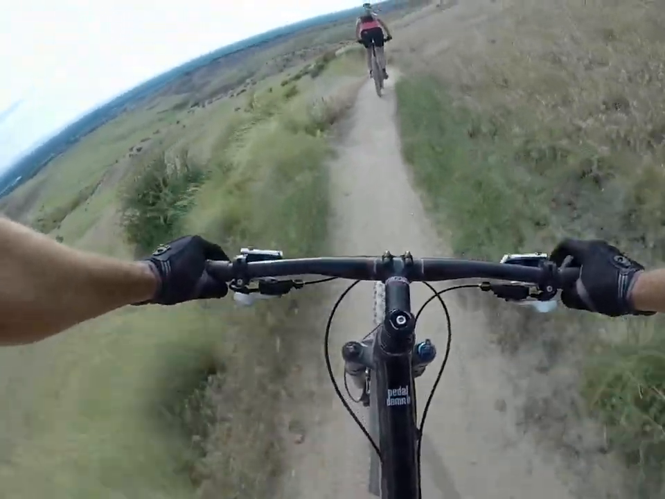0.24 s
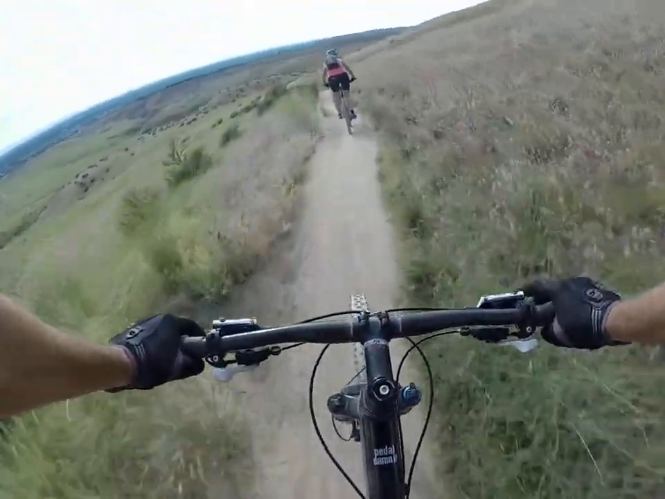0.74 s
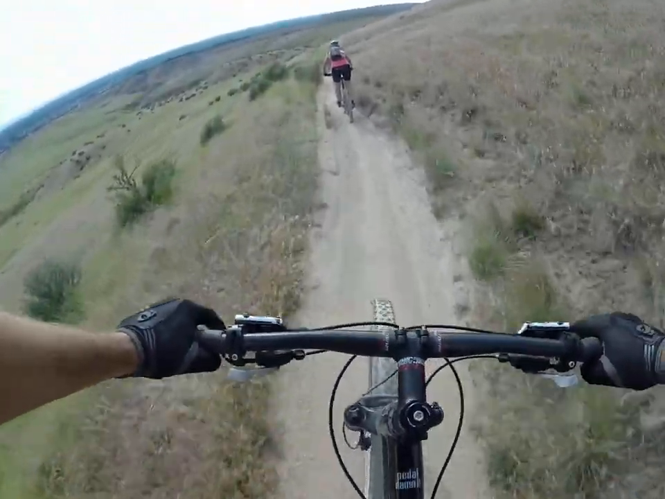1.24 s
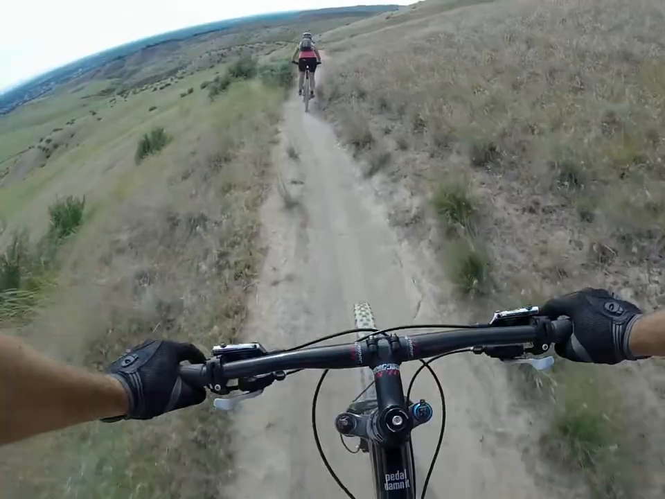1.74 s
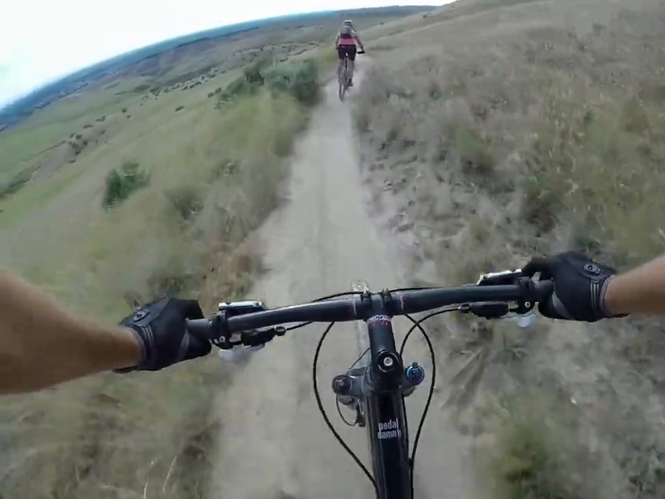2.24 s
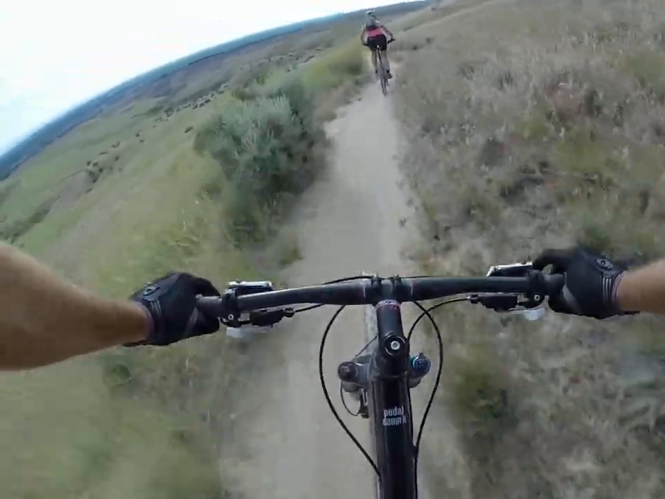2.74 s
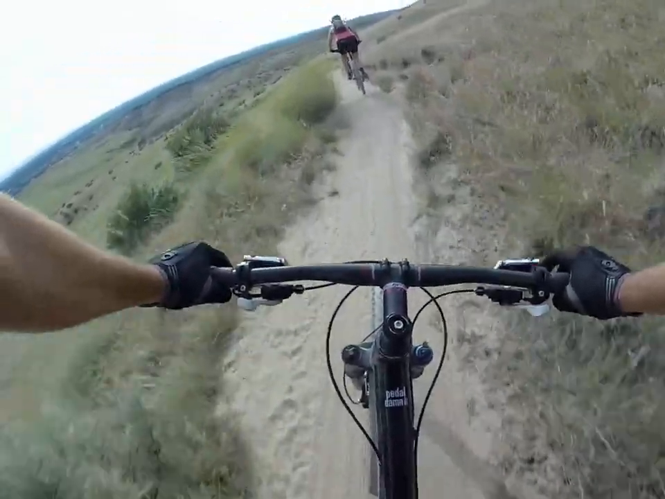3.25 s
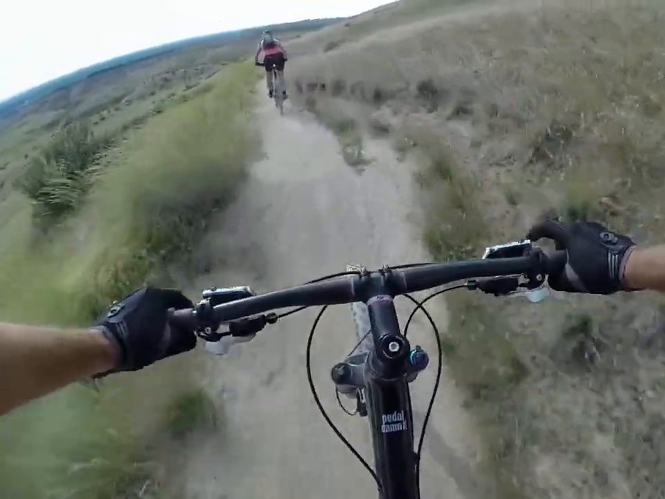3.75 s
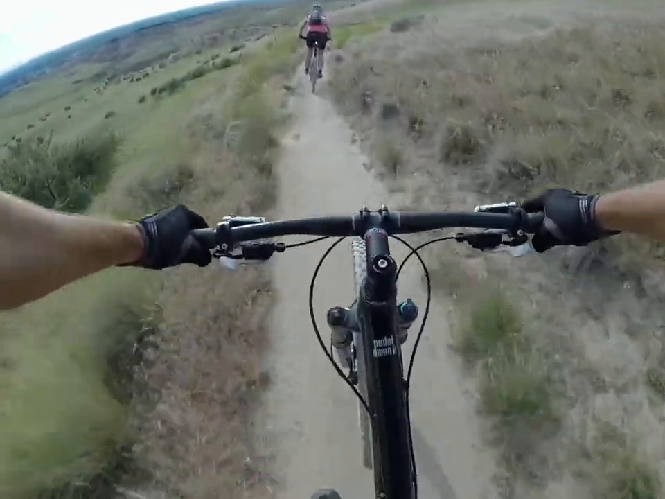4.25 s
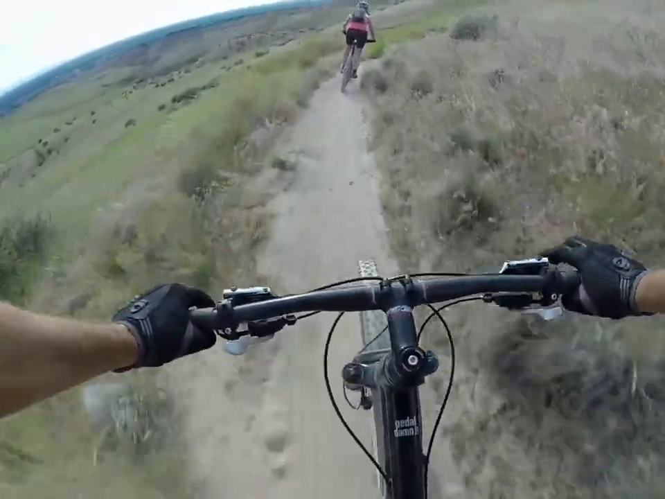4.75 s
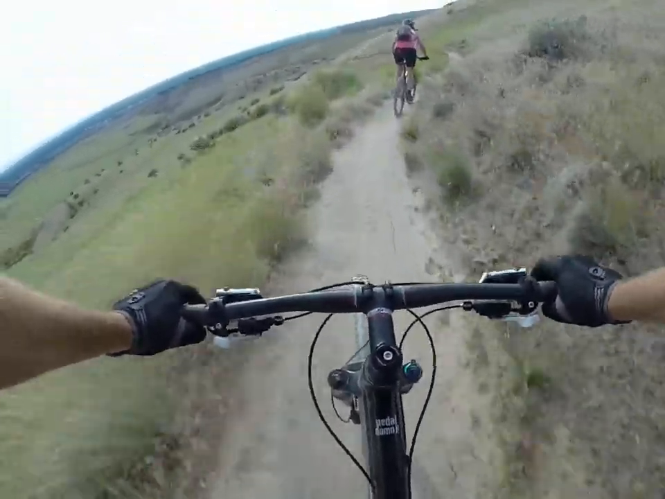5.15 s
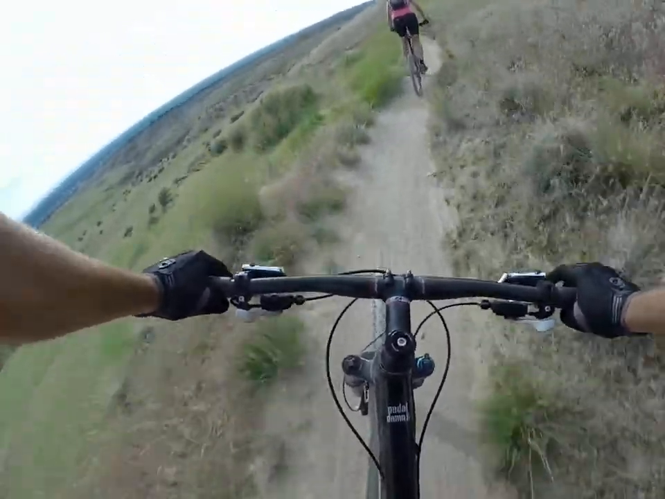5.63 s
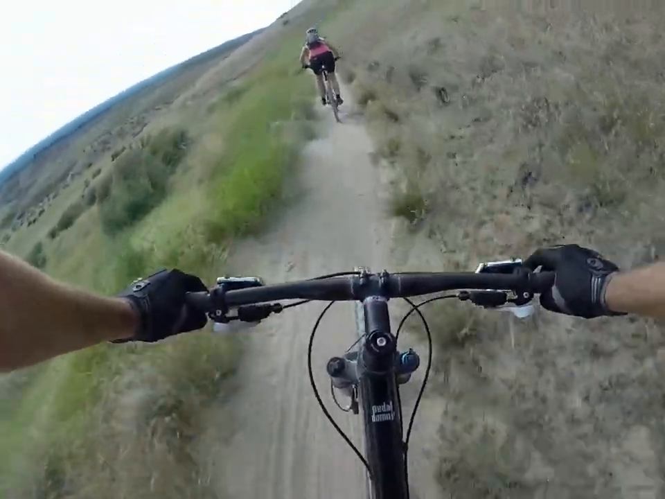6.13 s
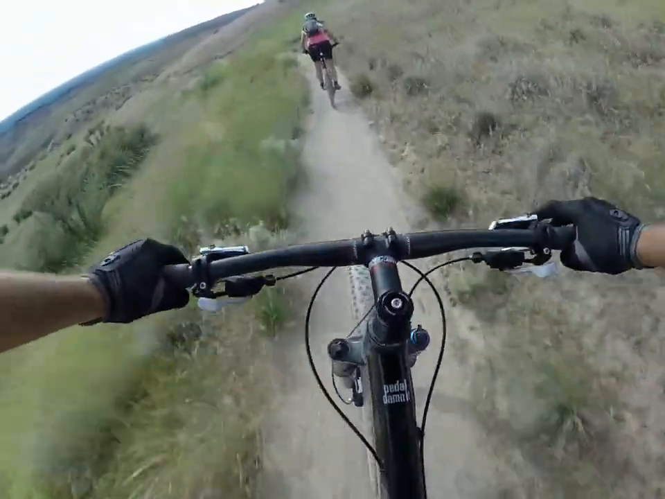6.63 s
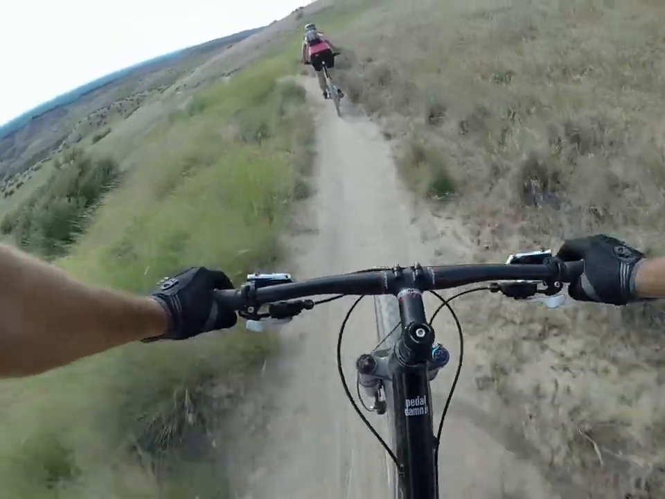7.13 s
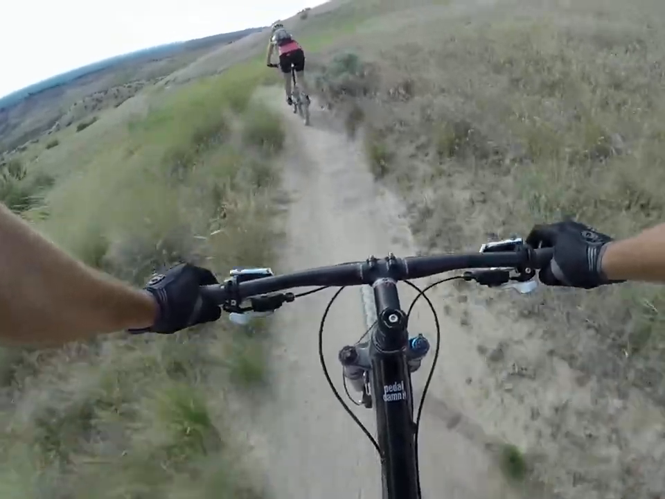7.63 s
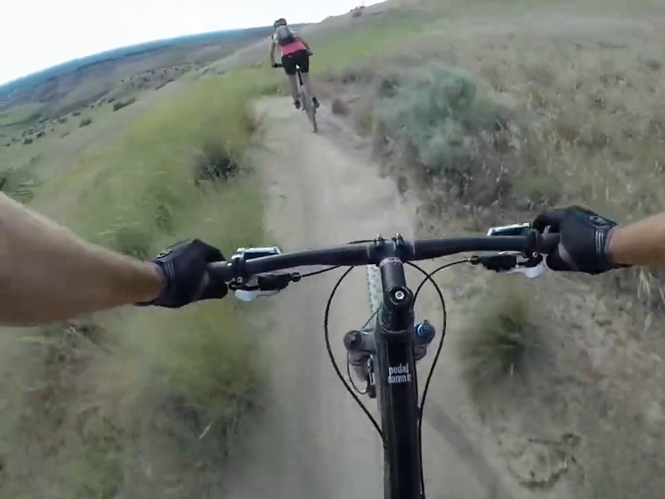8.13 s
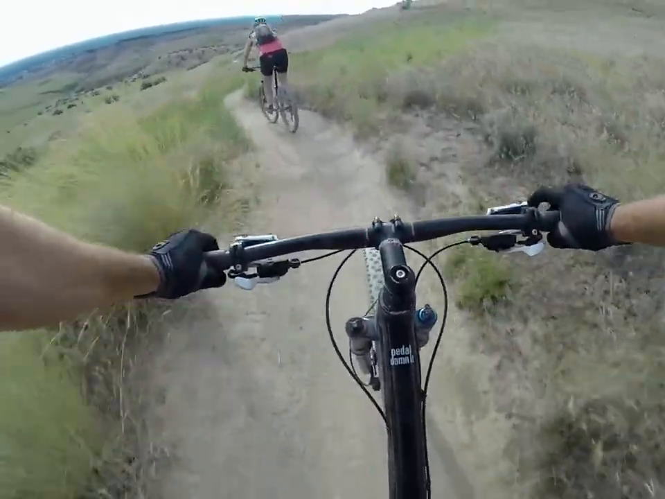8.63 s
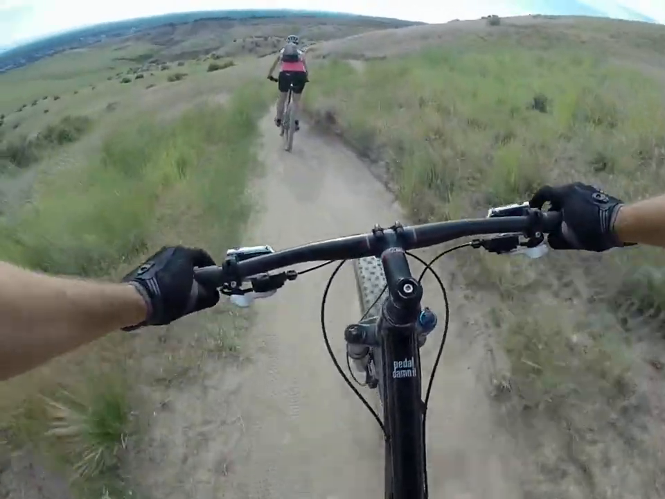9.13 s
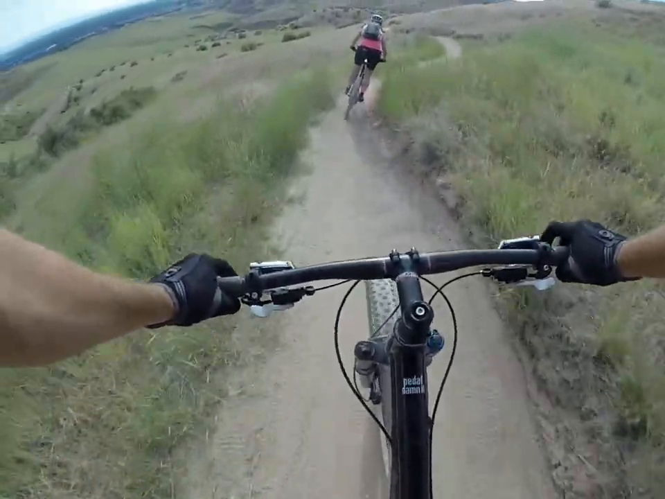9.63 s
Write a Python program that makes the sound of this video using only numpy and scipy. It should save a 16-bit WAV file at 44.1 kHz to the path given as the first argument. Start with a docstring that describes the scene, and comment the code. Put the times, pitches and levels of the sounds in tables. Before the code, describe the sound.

Wind buffets the microphone as a mountain bike coasts over crunching dirt, its disc brakes squealing on and off between bumps and knocks.

```python
"""Wind buffets the microphone and knobby tyres rumble and crunch: a mountain bike coasts down a dry dirt
trail, heard from a cased camera on the rider's chest, about a metre above the wheels, in open air.
The freehub's pawls tick; disc brake pads drag, graze and stick on the rotors, which whirr, chirp and squeal.
Dips heave the camera, the chain slaps, stones click on the frame and bumps knock the case.
Near the middle the bike lands a small hop; towards the end it brakes hard and rolls on."""
import sys
import numpy as np
from scipy import signal
from scipy.fft import rfft, irfft, next_fast_len
from scipy.io import wavfile
from scipy.ndimage import uniform_filter1d

SR = 44100
rng = np.random.default_rng(int(sys.argv[2]) if len(sys.argv) > 2 else 0)


def inscribe(sig):
    """Save sig as 16-bit PCM at rate SR to the path in sys.argv[1].

    A 1-D sig is mono; a 2-D sig holds one channel per row.
    Samples are clipped to [-1, 1] before scaling.
    """
    pcm = np.round(np.clip(np.atleast_2d(sig).T, -1, 1) * 32767)
    wavfile.write(sys.argv[1], SR, pcm.astype(np.int16))


N = 435708
TIME = np.arange(N) / SR


def from_db(db):
    """Decibels to gain."""
    return 10 ** (np.asarray(db) / 20)


def rms_one(x):
    """Scale to unit power."""
    return x / np.sqrt(np.mean(x ** 2) + 1e-20)


def in_time(rows):
    """Rows of (time, values...) as one curve per value, at every sample."""
    s, *columns = np.transpose(rows)
    return [np.interp(TIME, s, column) for column in columns]


def swell(s, half_s):
    """A bell curve of height 1 at time s, down to 1/e at half_s either side."""
    out = np.zeros(N)
    near = slice(*np.searchsorted(TIME, [s - 4 * half_s, s + 4 * half_s]))
    out[near] = np.exp(-((TIME[near] - s) / half_s) ** 2)
    return out


def drift(hz):
    """A random wander of rms 1, mostly slower than hz."""
    step, settle = 40, 2000
    pole = np.exp(-2 * np.pi * hz * step / SR)
    noise = rng.standard_normal(N // step + settle + 2)
    slow = signal.lfilter([1], [1, -2 * pole, pole * pole], noise)[settle:]
    return np.interp(np.arange(N) / step, np.arange(len(slow)), rms_one(slow))


def grains(per_s, spread_db):
    """Random clicks of uneven size; rms 1."""
    sizes = from_db(spread_db * np.minimum(rng.exponential(1, N), 5))
    return rms_one(sizes * rng.choice([-1, 1], N) * (rng.random(N) < per_s / SR))


def colour(x, spectrum):
    """Shape a steady sound by rows of (frequency [Hz], gain [dB]); rms 1."""
    size = next_fast_len(N)
    hz, db = np.transpose(spectrum)
    bins = np.maximum(np.fft.rfftfreq(size, 1 / SR), 1)
    gain = from_db(np.interp(np.log(bins), np.log(hz), db, left=-120))
    return rms_one(irfft(rfft(x, size) * gain, size)[:N])


def highpass(x, hz):
    """Roll off the sound below hz."""
    return signal.sosfilt(signal.butter(2, hz, "high", fs=SR, output="sos"), x)


def even(x, seconds):
    """Hold the power of a noise steady over the given time."""
    size = max(int(seconds * SR), 2)
    return x / np.sqrt(uniform_filter1d(uniform_filter1d(x * x, size), size) + 1e-12)


def resonate(x, modes):
    """Pass a sound through parallel resonances, rolled off above 8.6 kHz; rms 1."""
    out = 0
    for hz, width, db in modes:
        r = np.exp(-np.pi * width / SR)
        poles = [1, -2 * r * np.cos(2 * np.pi * hz / SR), r * r]
        out += from_db(db) * (1 - r * r) * signal.lfilter([1, 0, -1], poles, x + 1e-18)
    return rms_one(signal.sosfilt(signal.butter(6, 8600, fs=SR, output="sos"), out))


def ring(x, hz, t60):
    """One mode: a unit click sets off a decaying sine of height 1."""
    r, w = from_db(-60 / (t60 * SR)), 2 * np.pi * hz / SR
    return signal.lfilter([0, np.sin(w)], [1, -2 * r * np.cos(w), r * r], x + 1e-18)


def add(out, s, sound):
    """Mix a short sound in at time s."""
    start = int(np.clip(s * SR, 0, N - 1))
    out[start:start + len(sound)] += sound[:N - start]


def through_case(x):
    """Sound reaches the microphone through the resonances of the plastic case; rms 1."""
    # modes of the case: (frequency [Hz], width [Hz], gain [dB])
    case_modes = [(1594, 230, 4), (2260, 210, 7.5), (2720, 110, 0), (3230, 130, 2), (3735, 100, -2),
                  (4280, 170, -2), (5020, 220, -6.5), (5780, 260, -5), (6750, 400, -13), (7520, 220, -9),
                  (8350, 350, -15)]
    return resonate(x, case_modes)


def wind(calm_db=-38.5, sway_db=.8):
    """Eddies shed by the rider press on the case, right at the microphone: light buffeting and gusts."""
    # gusts on the case: (time [s], half length [s], level [dB])
    gusts = [(0.0, .06, -24), (.25, .2, -29.5), (.85, .14, -25), (2.3, .17, -32), (3.2, .22, -27.5),
             (4.5, .06, -27), (4.85, .08, -29), (5.09, .07, -24), (5.45, .33, -25.5), (6.58, .04, -29),
             (7.0, .14, -31), (7.62, .24, -27), (8.25, .22, -18.5), (8.62, .1, -24), (9.27, .3, -26)]
    # spectrum of the buffeting: (frequency [Hz], gain [dB])
    buffet_spectrum = [(12, -5.5), (22, 6), (45, -4.5), (80, -15), (130, -35), (250, -44.5), (600, -87)]
    calm = from_db(calm_db + sway_db * drift(2))
    power = calm ** 2 + sum((from_db(db) * swell(s, half_s)) ** 2 for s, half_s, db in gusts)
    return np.sqrt(power) * even(colour(rng.standard_normal(N), buffet_spectrum), seconds=.17)


def air(level_db=-78):
    """Air streams past the case in a thin, even hiss."""
    return from_db(level_db) * rms_one(highpass(rng.standard_normal(N), 5000))


def ground(return_s=.025):
    """Tyre levels along the trail; over a crest they ebb as the weight lifts and snap back with it."""
    # the surface: (time [s], packed dirt rumble [dB], gravel crunch [dB], loose grit hiss [dB])
    trail = [(0.0, -41.0, -50.0, -59.0), (0.42, -46.0, -52.5, -57.5), (0.72, -41.5, -49, -61.0),
             (1.9, -42, -49, -57.5), (2.55, -40.5, -49.0, -55.0), (3.4, -46.5, -52.0, -55.5),
             (3.68, -44.5, -52.0, -62.0), (4.7, -43.0, -50.5, -58.0), (5.75, -40.0, -50.0, -55.0),
             (6.35, -45.0, -51.0, -55.5), (6.95, -44.0, -50.0, -60.5), (7.25, -50.5, -51.0, -59.0),
             (7.5, -43.0, -50.5, -54.5), (8.2, -43.5, -51.5, -54.5), (8.75, -47.0, -54.0, -57.5),
             (9.88, -48.0, -54.0, -58.5)]
    # the bike goes light: (time the weight is back [s], length [s], drop in crunch [dB])
    crests = [(1.3, .38, 6.2), (4.01, .28, 2.5), (4.34, .22, 8.5)]
    rumble_db, crunch_db, grit_db = in_time(trail)
    drop_db = sum(np.interp(TIME, [s - length, s - return_s, s], [0, db, 0]) for s, length, db in crests)
    return rumble_db - .55 * drop_db, crunch_db - drop_db, grit_db - .95 * drop_db


def tyres(rumble_db, crunch_db, grit_db):
    """A metre below, knobs drum on dirt, crush gravel and spray grit, all following the jolting load."""
    # spectra of packed dirt, gravel and grit: (frequency [Hz], gain [dB])
    dirt_spectrum = [(30, -12), (48, 2.5), (75, 5.5), (120, 1.5), (200, -2.8), (300, -6.8), (450, -13.8),
                     (700, -17.2), (1100, -23), (2000, -62)]
    gravel_spectrum = [(400, -11), (800, -0.5), (1200, -5), (1650, 2), (2400, 6.3), (3000, 0), (3800, -6),
                       (6000, -45.5)]
    grit_spectrum = [(2000, 11), (3500, -3.5), (5000, 6.5), (6500, 2), (8100, -5), (9200, -30),
                     (10300, -24), (12000, -18), (15000, -20)]
    throb, rocking = washboard()
    load = drift(22.3) + 1.7 * rocking
    slam_db = 13 * swell(4.432, half_s=.036)  # the tyres squash into the dirt on landing
    sand_db = grit_db - 2
    pebbles_db = (crunch_db + grit_db) / 2 + 3.5
    rumble = even(colour(rng.standard_normal(N), dirt_spectrum), seconds=.15)
    rumble *= from_db(rumble_db + slam_db + 1.25 * load)
    gravel = colour(grains(per_s=6000, spread_db=3), gravel_spectrum) * from_db(crunch_db + 1.1 * load)
    sand = colour(grains(per_s=20000, spread_db=.5), grit_spectrum) * from_db(sand_db + 1.9 * load)
    pebbles = through_case(grains(per_s=9000, spread_db=2.5)) * from_db(pebbles_db + .75 * load)
    return throb + rumble + gravel + sand + pebbles


def freehub(clicks_per_s=88, level_db=-62.5):
    """Behind the rider, pawls drop into each ratchet tooth of the coasting wheel, some harder."""
    tooth = np.cumsum(clicks_per_s * (1 + .06 * drift(.6))) / SR
    snaps = rng.standard_normal(N) * np.exp(-(tooth % 1) / .15)
    snaps *= from_db(6.5 * np.tanh(drift(46)))
    return through_case(highpass(snaps, 4500)) * from_db(level_db)


def whirr(shimmer_db=2):
    """Down at the hubs, pads drag without gripping and keep the high modes of the rotors ringing."""
    # the pads drag: (time [s], half length [s], level [dB])
    drags = [(.25, .2, -59), (2.9, .3, -56), (3.36, .13, -53.5), (5.8, .4, -58), (7.6, .22, -55.5),
             (8.05, .2, -54), (8.8, .3, -58)]
    # modes of a rotor: (frequency [Hz], width [Hz], gain [dB])
    rotor_modes = [(4310, 170, 0), (5060, 220, -3), (5900, 320, -2), (7570, 190, -1.5), (8400, 300, -16)]
    drag = sum(from_db(db) * swell(s, half_s) for s, half_s, db in drags)
    return drag * resonate(rng.standard_normal(N), rotor_modes) * from_db(shimmer_db * drift(40))


def rotor_chirps(ring_hz=3170, flutter_per_s=74, rise_hz=330):
    """A lightly grazed rotor sings in a quick flutter of soft chirps, each gliding upwards."""
    # a rotor grazes its pad: (time [s], length [s], level [dB])
    grazes = [(0.265, .08, -50), (0.97, .04, -50), (1.605, 0.032, -45), (1.715, 0.025, -47),
              (1.868, 0.072, -43.5), (1.975, 0.028, -46.5), (2.045, 0.035, -46), (3.576, .07, -53),
              (5.776, 0.16, -54), (6.9, 0.055, -50)]
    touch = sum(from_db(db) * swell(s, length / np.sqrt(2)) for s, length, db in grazes)
    progress = np.cumsum(flutter_per_s * (1 + .22 * drift(40))) / SR % 1  # 0 to 1 in each chirp
    hz = ring_hz * (1 + .014 * drift(150)) + rise_hz * (progress - .5)
    grip = np.sin(np.pi * progress) * from_db(3.5 * np.tanh(drift(60)))
    return touch * rms_one(grip * np.sin(2 * np.pi * np.cumsum(hz) / SR))


def gravel_spits():
    """Loose gravel shoots out from under a knob in a short, coarse rattle."""
    # sprays of gravel: (time [s], half length [s], level [dB])
    spits = [(.385, .012, -47), (.74, .05, -47), (1.308, .012, -49), (1.41, .025, -45), (2.095, .02, -44),
             (2.25, .018, -44), (2.53, .012, -43), (2.68, .025, -43), (3.6, .045, -48),
             (3.925, .035, -47.5), (4.385, .03, -47), (4.43, .03, -46), (5.375, .012, -45),
             (5.47, .03, -45), (6.12, .07, -48), (6.85, .02, -46), (7.225, .012, -45), (8.21, .012, -39),
             (8.26, .012, -40), (8.33, .012, -40), (8.38, .025, -39), (9.57, .02, -46)]
    # spectrum of the spray: (frequency [Hz], gain [dB])
    spray_spectrum = [(600, -14), (1200, -11), (1800, -6), (2350, 2), (3100, -3), (4200, -11), (7000, -18),
                      (10000, -32), (15000, -42)]
    bursts = sum(from_db(db) * swell(s, half_s) for s, half_s, db in spits)
    return bursts * even(colour(grains(per_s=1300, spread_db=2.5), spray_spectrum), seconds=.025)


def heaves(harness_hz=26, half_s=.024):
    """Each dip in the trail swings the camera down and back on its harness in one soft thump."""
    # the bike drops into a dip: (time [s], peak [dB])
    dips = [(0.865, -19), (3.32, -23), (5.24, -17), (5.302, -14), (5.421, -11), (5.505, -13), (5.61, -12.5),
            (8.122, -14), (8.325, -9), (9.045, -19), (9.192, -14), (9.31, -16), (9.409, -14.5)]
    out = np.zeros(N)
    t = TIME[:SR // 5] - TIME[SR // 10]
    thump = -np.exp(-(t / half_s) ** 2) * np.cos(2 * np.pi * harness_hz * t)
    for s, db in dips:
        add(out, s + t[0], from_db(db) * thump)
    return out


def washboard():
    """Regular ripples rock the bike; returns the low throb and the swing in tyre load."""
    # rippled stretches of trail: (time [s], length [s], ripple rate [Hz], level [dB])
    ripples = [(0.89, 0.2, 42, -35), (8.17, 0.22, 20, -15.5)]
    throb, load = 0, 0
    for s, length, hz, db in ripples:
        contact = swell(s, length / np.sqrt(2))
        phase = 2 * np.pi * np.cumsum(hz * (1 + .0574 * drift(11.7))) / SR
        judder = np.sin(phase) + .14 * np.sin(2 * phase) + .065 * np.sin(3 * phase)
        throb += contact * from_db(db) * judder
        load += contact * np.sin(phase)
    return throb, load


def brakes():
    """The disc brakes squeal an arm's length or more below the microphone: light pulls, one hard one."""
    tremble = .008 * drift(30) + .013 * drift(180)
    shake = drift(80) + 1j * drift(80)
    rub = through_case(rng.standard_normal(N))
    paths = [drift(24) + 1j * drift(23) for _ in range(3)]
    unrest = [tremble, shake, rub, *paths]
    return light_braking(unrest) + hard_braking(unrest)


def light_braking(unrest, range_db=22, roundness=1.65, rise_per_db=.0006, sag_hz_per_s=40):
    """Squeals swell and fade with the lever, stuttering as the rotor's spokes pass."""
    # pulls of the lever: (full grip [s], swell [s], fade [s], pitch [Hz], fundamental [dB],
    # second partial [dB], roughness [0-1], spokes passing [1/s], stutter [0-1])
    pulls = [(2.598, .15, .2, 726, -45.5, -37.5, .4, 19, .75),
             (3.275, .18, .27, 782, -51.5, -51, .45, 8, .3),
             (6.302, .17, .13, 778, -46.5, -43.5, .5, 13, .75),
             (8.637, .145, .35, 730, -42, -31, .38, 14.3, .8),
             (9.24, .26, .25, 786, -52, -43.5, .7, 8, .45)]
    # the pads bite and the upper partials flare: (time [s], half length [s], rise [dB])
    bites = [(8.718, .026, 11.5), (9.135, .026, 18)]
    out = np.zeros(N)
    bite_db = sum(db * swell(s, half_s) for s, half_s, db in bites)
    for s, swell_s, fade_s, pitch_hz, first_top_db, second_top_db, rough, spokes_per_s, stutter in pulls:
        on = (TIME > s - swell_s) & (TIME < s + fade_s)
        t = TIME[on] - s
        slack_db = range_db * np.maximum(-t / swell_s, t / fade_s) ** roundness
        # round pulses parted by narrow dips
        stutter_db = 10 * np.log10(1 + stutter * np.cos(2 * np.pi * spokes_per_s * t))
        # the pitch lies a little higher under a slack pad and sinks as the wheel slows
        hz = pitch_hz * (1 + rise_per_db * slack_db) - sag_hz_per_s * t
        first_db = first_top_db - .65 * slack_db
        second_db = second_top_db - slack_db
        third_db = second_db - 13.5 + bite_db[on]
        out[on] += squeal(on, hz, first_db, second_db + stutter_db, third_db, unrest, rough, flutter=.7)
    return out


def squeal(on, hz, first_db, second_db, third_db, unrest, rough, flutter, rub_db=-13, fade_s=.02):
    """A pad sticks and slips on its rotor: trembling partials with rubbing noise."""
    # the higher partials: (frequency [Hz], level against the third partial [dB])
    overtones = [(2900, -17), (3170, -11), (3650, -28), (3900, -19), (4400, -28), (5100, -21), (5600, -28),
                 (7900, -38), (11000, -44)]
    tremble, shake, rub, *paths = (curve[on] for curve in unrest)
    phase = 2 * np.pi * np.cumsum(hz * (1 + rough * tremble)) / SR
    upper_db = [third_db + np.interp(k * hz.mean(), *np.transpose(overtones)) for k in range(4, 15)]
    out = rough * from_db(second_db + rub_db) * rub
    for k, db in enumerate([first_db, second_db, third_db] + upper_db, 1):
        # paths from the turning rotor interfere in sudden dips; the upper partials come and go together
        sway = 1 + flutter * paths[min(k, len(paths)) - 1] + .3 * rough * np.sqrt(k) * shake
        sway /= np.sqrt(4 + np.abs(sway) ** 2)  # flattens the peaks, keeps the dips
        out += from_db(db) * rms_one(np.imag(sway * np.exp(1j * k * phase)))
    t = TIME[on]
    return out * np.clip(np.minimum(t - t[0], t[-1] - t) / fade_s, 0, 1)


def blow(modes, scuff_s, scuff):
    """A contact with a short scuff behind it rings a set of modes; peak 1."""
    t = TIME[:SR // 6]
    force = scuff * rng.standard_normal(len(t)) * np.exp(-t / scuff_s)
    force[0] += 1
    sound = sum(from_db(db) * ring(force, hz, t60) for hz, db, t60 in modes)
    return sound / np.abs(sound).max()


def frame_hits():
    """Down by the pedals, the chain slaps the chainstay and stones click on the frame."""
    # chain slaps and stone clicks: (time [s], peak [dB])
    slaps = [(4.023, -29.5), (4.7825, -30), (5.443, -27.5), (7.206, -33), (7.445, -33), (9.498, -32)]
    clicks = [(4.3917, -33), (4.4413, -33), (4.8723, -32), (4.9646, -37), (5.568, -34.5), (8.2206, -32.5),
              (8.308, -28.5), (8.3554, -28), (8.5644, -38), (9.1476, -32)]
    # the modes that each rings: (frequency [Hz], gain [dB], t60 [s])
    slap_modes = [(1580, 0.5, 0.021), (2240, 3, 0.017), (2780, -5, .012)]
    frame_modes = [(5050, 1, 0.017), (5780, 8.5, 0.01), (7230, 11, 0.0073), (9130, -8.5, .008),
                   (11800, -19, .008), (13800, -20, .008)]
    out = np.zeros(N)
    for s, db in slaps:
        add(out, s, from_db(db) * blow(slap_modes, scuff_s=.007, scuff=.22))
    for s, db in clicks:
        add(out, s, from_db(db) * blow(frame_modes, scuff_s=.0055, scuff=.27))
    return out


def thud(db, hz, t60):
    """A heavily damped swing of the camera on its harness; it builds up over half a cycle."""
    t = TIME[:SR // 2]
    rise = np.sin(np.pi * np.minimum(t * hz, .5))
    swing = rise * from_db(-60 * t / t60) * np.sin(2 * np.pi * hz * t)
    return from_db(db) * swing / np.abs(swing).max()


def camera_jolts(thud_cycles=3.2):
    """Right at the microphone, the landing heaves the case, bumps knock it and a rap rings its mount."""
    # front and rear wheel land: (time [s], peak [dB], frequency [Hz], t60 [s])
    landings = [(4.402, -3.5, 22, .17), (4.447, -11, 24, .07)]
    # knocks on the case, one rap on the mount: (time [s], thud [dB], thud frequency [Hz], ring [dB])
    knocks = [(4.402, -11.5, 76, -19.5), (4.412, -22, 260, -20), (4.4305, -15, 190, -19.5),
              (4.447, -14.5, 62, -40), (5.407, -21, 115, -38), (5.58, -23, 85, -46), (5.622, -21, 112, -42),
              (6.57, -26, 90, -46), (7.442, -26.5, 110, -32), (8.293, -18, 64, -44), (8.42, -17.5, 65, -44)]
    rap = [(7.0607, -15.5, 160, -21.5)]
    # modes of the jolted case and of the mount: (frequency [Hz], gain [dB], t60 [s])
    clack_modes = [(536, 1.5, 0.014), (730, -3, 0.019), (925, 1, 0.011), (1620, 6, 0.005), (2300, 4, .01)]
    mount_modes = [(2170, 8, 0.023), (2360, -3, .02), (2570, -16, .02)]
    out = np.zeros(N)
    for s, db, hz, t60 in landings:
        add(out, s, thud(db, hz, t60))
    for s, thud_db, hz, ring_db in knocks:
        add(out, s, -thud(thud_db, hz, thud_cycles / hz))
        add(out, s, from_db(ring_db) * blow(clack_modes, scuff_s=.0047, scuff=.14))
    for s, thud_db, hz, ring_db in rap:
        add(out, s, -thud(thud_db, hz, thud_cycles / hz))
        # the mount rings when the swing reaches its stop
        add(out, s + .31 / hz, from_db(ring_db) * blow(mount_modes, scuff_s=.001, scuff=.028))
    return out


def hard_braking(unrest, first_top_db=-41.5):
    """A hard-pressed pad grabs and slips in a ragged, rasping squeal."""
    # course of the squeal: (time [s], pitch [Hz], second partial [dB], third partial [dB])
    course = [(7.62, 785, -62, -66), (7.75, 783, -50, -56), (7.796, 773, -37, -52), (7.868, 777, -41, -48),
              (7.88, 776, -32, -30.5), (7.912, 782, -34, -30.5), (7.925, 780, -39, -43),
              (7.948, 780, -37, -38), (7.978, 787, -28.5, -30), (8.025, 785, -33, -29),
              (8.065, 793, -25.5, -30), (8.088, 791, -27, -43), (8.108, 791, -32, -42),
              (8.12, 792, -29, -27), (8.145, 786, -28, -27.5), (8.162, 764, -27.5, -38),
              (8.195, 772, -33, -38), (8.218, 775, -40, -41), (8.302, 784, -33, -32.5),
              (8.33, 787, -38, -49), (8.38, 782, -51, -52), (8.46, 782, -60, -64)]
    on = (TIME > course[0][0]) & (TIME < course[-1][0])
    hz, second_db, third_db = (curve[on] for curve in in_time(course))
    slack_db = second_db.max() - np.maximum(second_db, third_db)
    first_db = first_top_db - .65 * slack_db
    out = np.zeros(N)
    out[on] = squeal(on, hz, first_db, second_db, third_db, unrest, rough=.72, flutter=.45)
    out[on] += rasp(on, hz, level_db=third_db - 29)
    return out


def rasp(on, hz, level_db):
    """Under a hard grip every slip of the pad scrapes off a bright, gritty burst."""
    # spectrum of the scraping: (frequency [Hz], gain [dB])
    scrape_spectrum = [(3000, -4), (7000, 0), (9500, -10), (15000, -30)]
    since_slip = np.cumsum(hz) / SR % 1
    scrape = colour(grains(per_s=9000, spread_db=2.5), scrape_spectrum)[on]
    return from_db(level_db) * rms_one(scrape * np.exp(-since_slip / .3))


def scene():
    """Everything rides along with the one microphone, at a steady distance, in open air."""
    riding = wind() + air() + heaves() + tyres(*ground()) + gravel_spits()
    hubs = freehub() + whirr() + brakes() + rotor_chirps()
    return (riding + hubs + camera_jolts() + frame_hits())[None]


def record(dry, ceiling=.9, cutoff_hz=15400):
    """The chest microphone rounds off the biggest heaves; the top of the treble is cut."""
    rounded = ceiling * np.tanh(dry / ceiling)
    return signal.sosfilt(signal.ellip(10, .1, 80, cutoff_hz, fs=SR, output="sos"), rounded)


dry = scene()
out = record(dry)
inscribe(out)
```